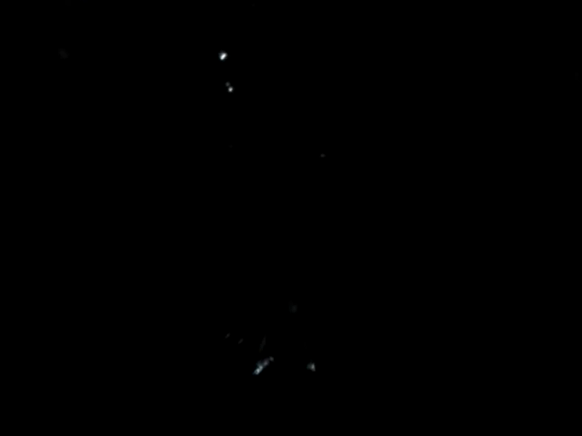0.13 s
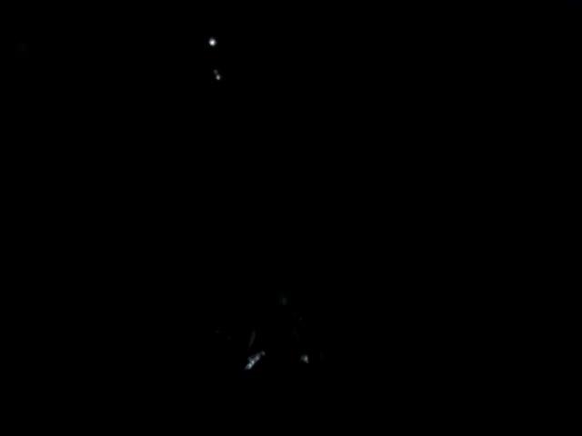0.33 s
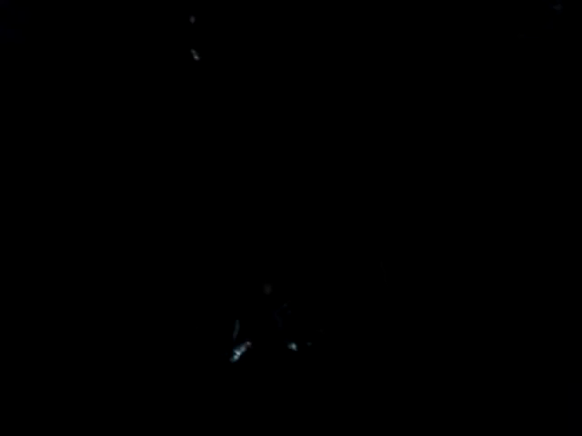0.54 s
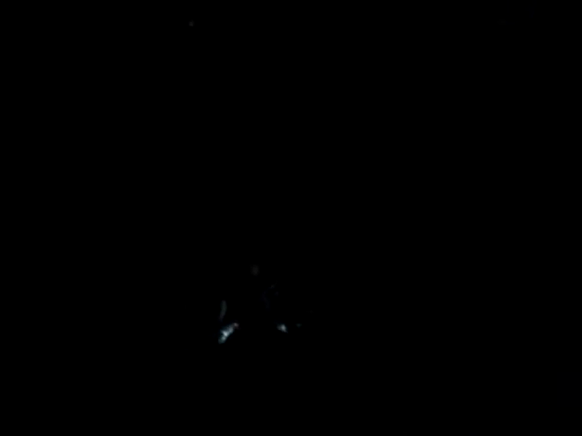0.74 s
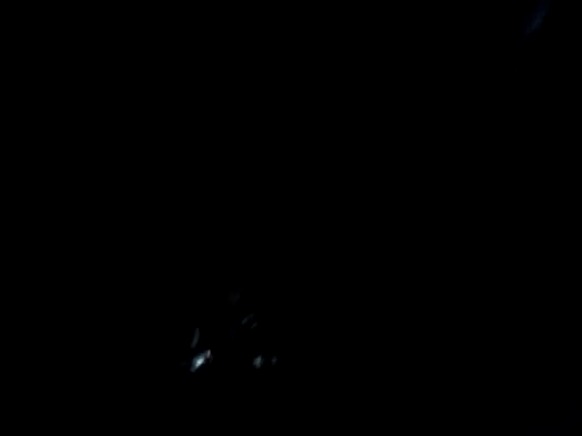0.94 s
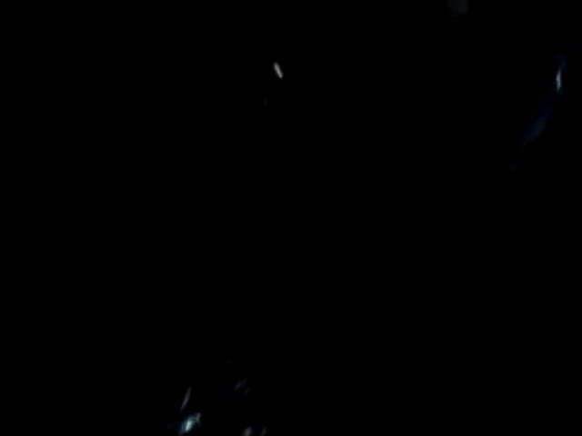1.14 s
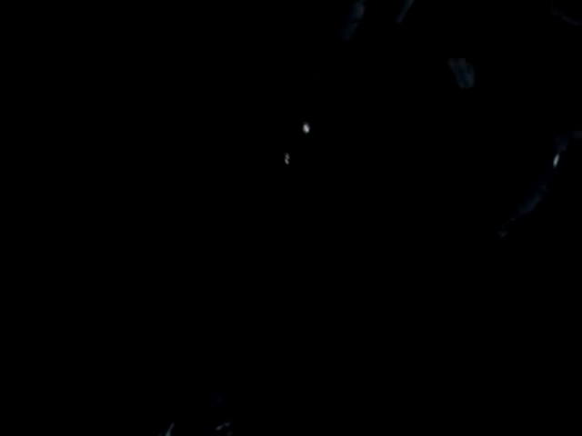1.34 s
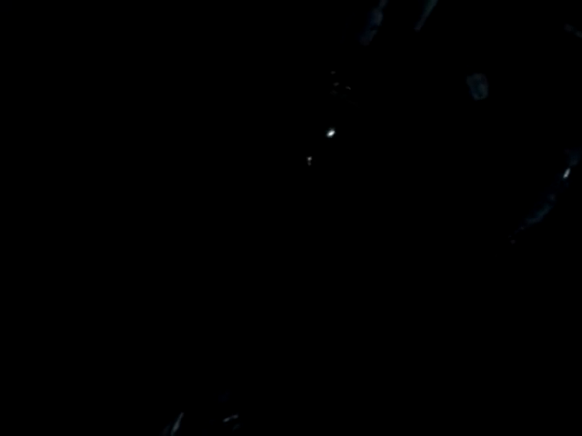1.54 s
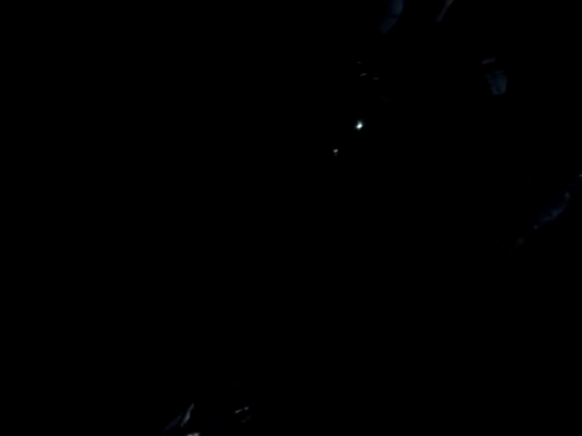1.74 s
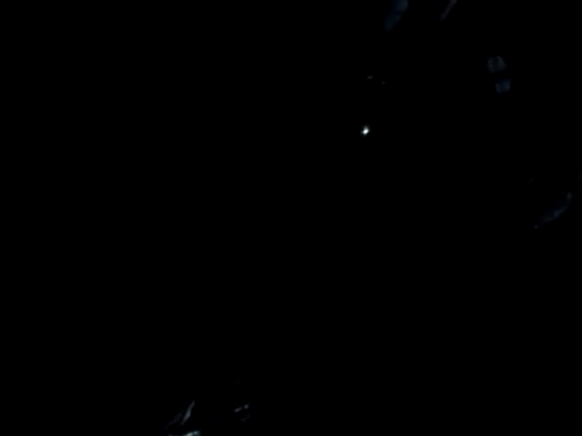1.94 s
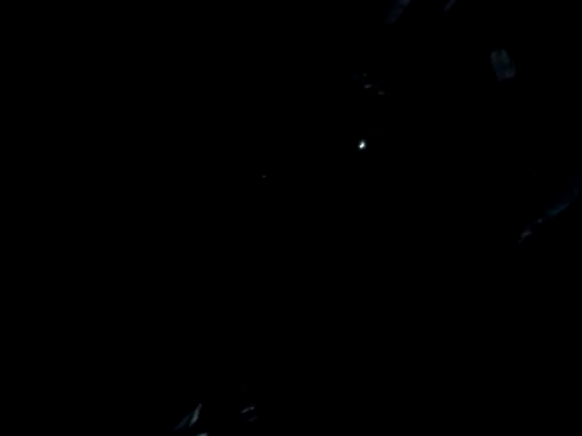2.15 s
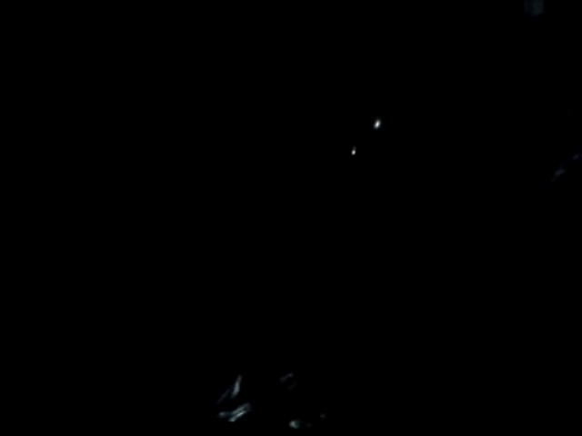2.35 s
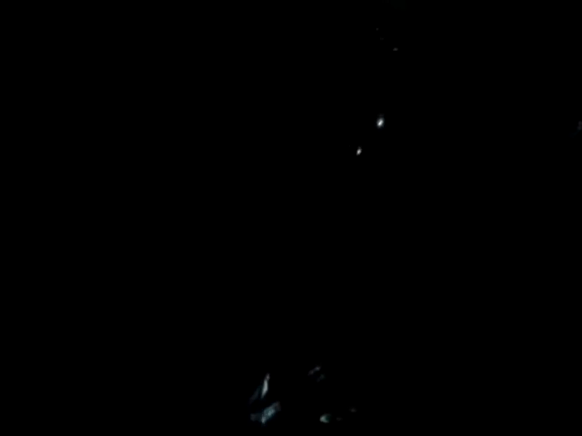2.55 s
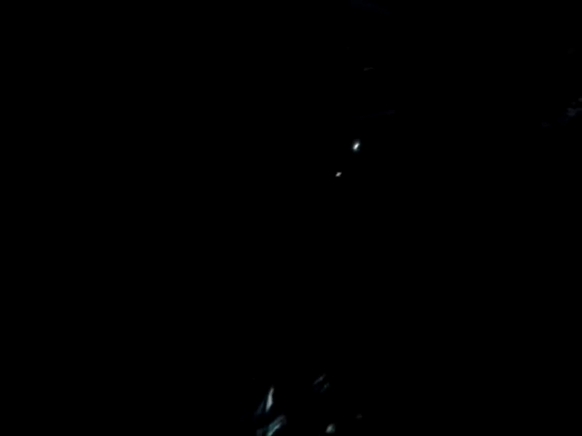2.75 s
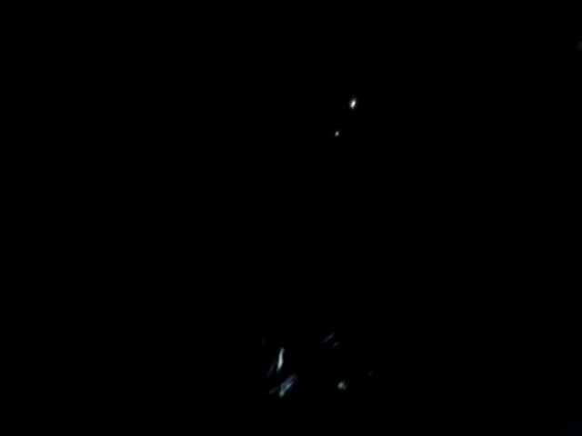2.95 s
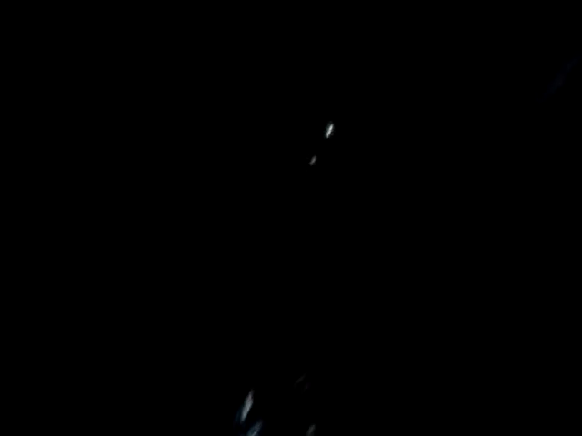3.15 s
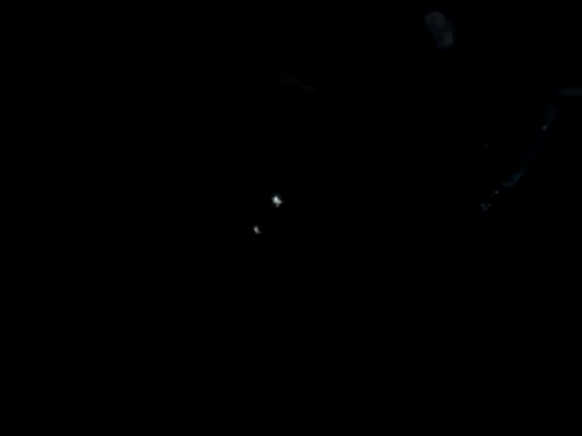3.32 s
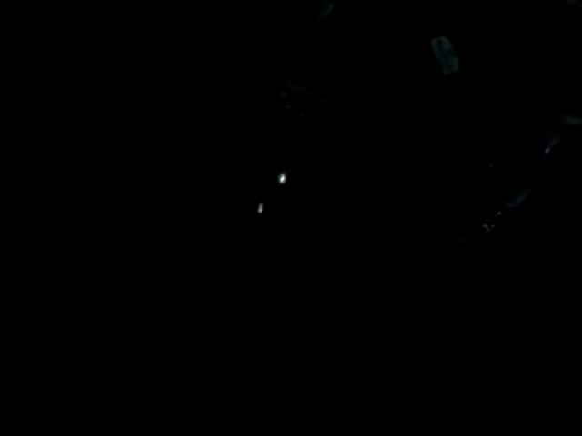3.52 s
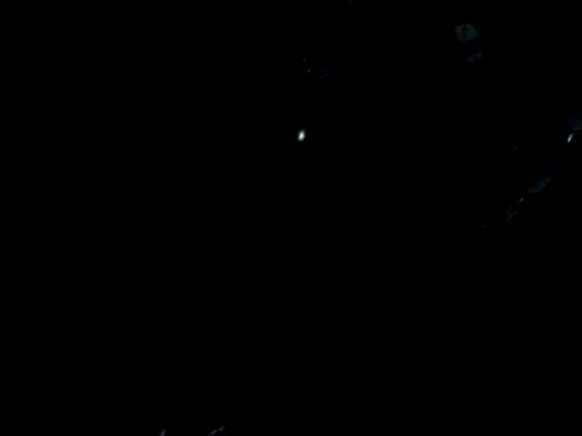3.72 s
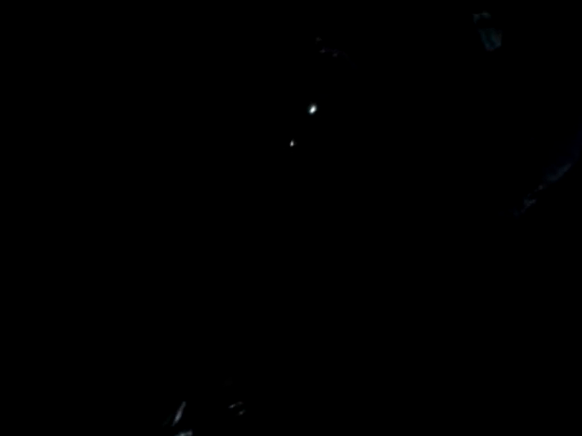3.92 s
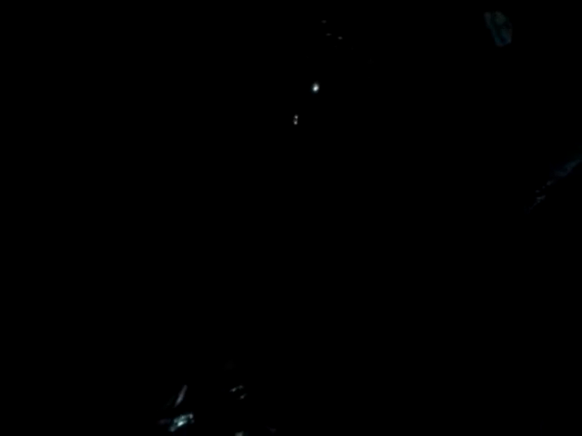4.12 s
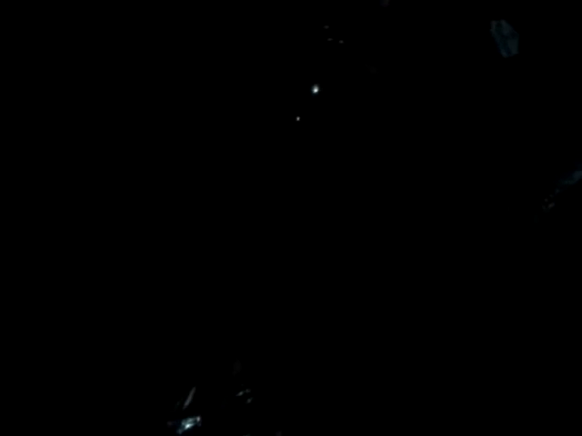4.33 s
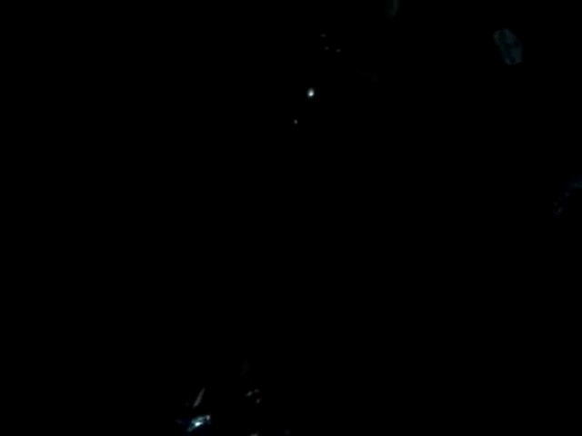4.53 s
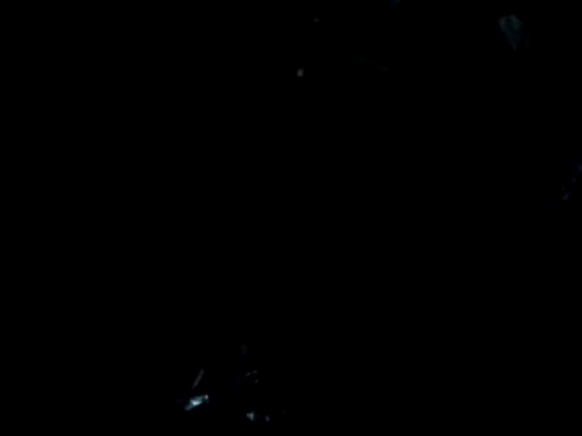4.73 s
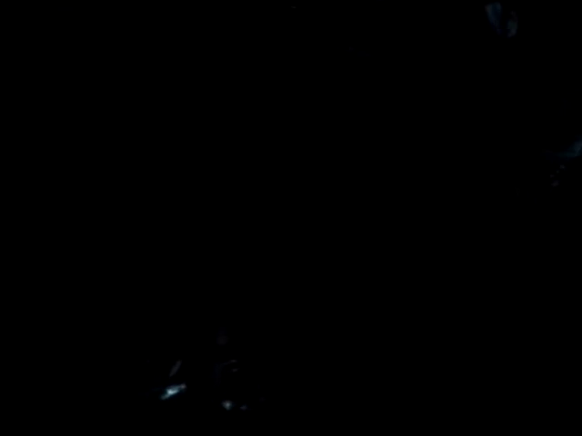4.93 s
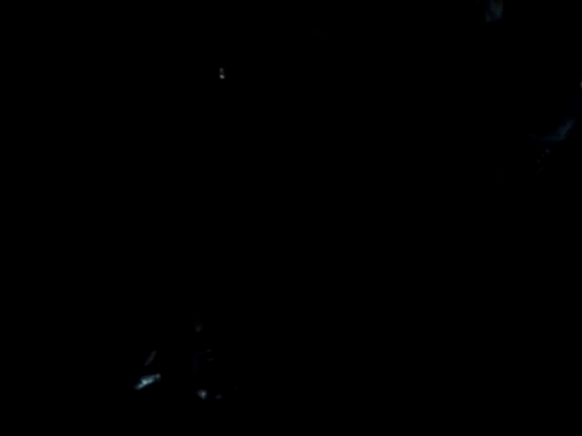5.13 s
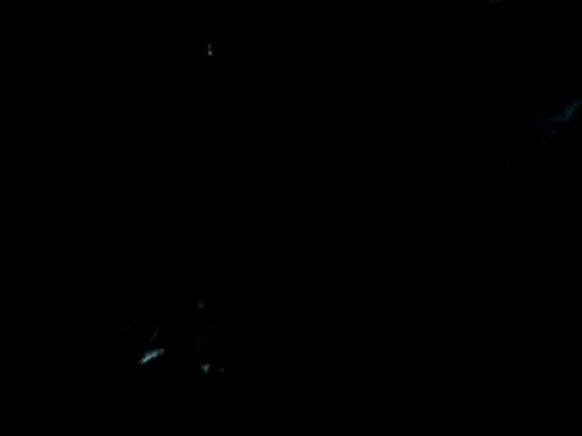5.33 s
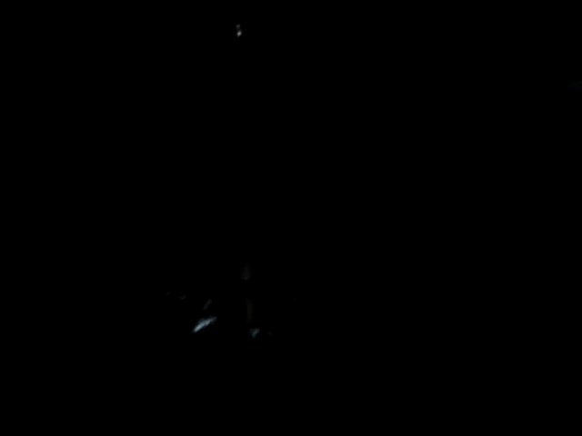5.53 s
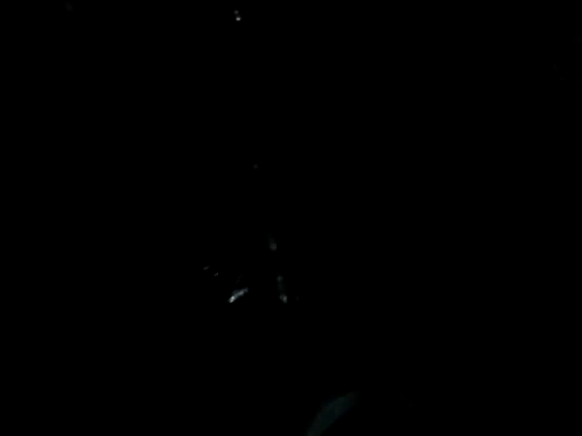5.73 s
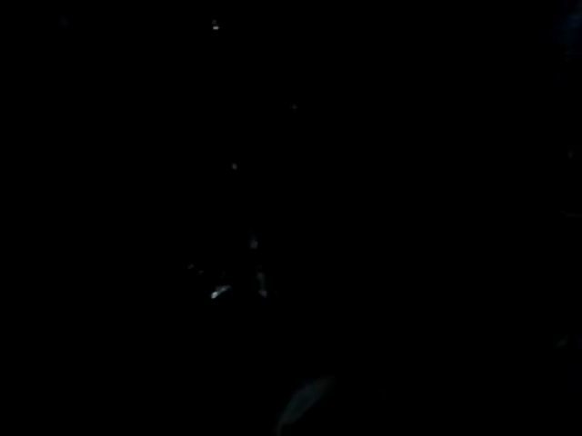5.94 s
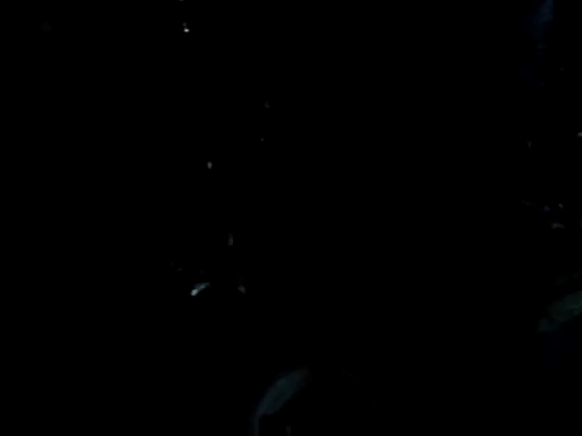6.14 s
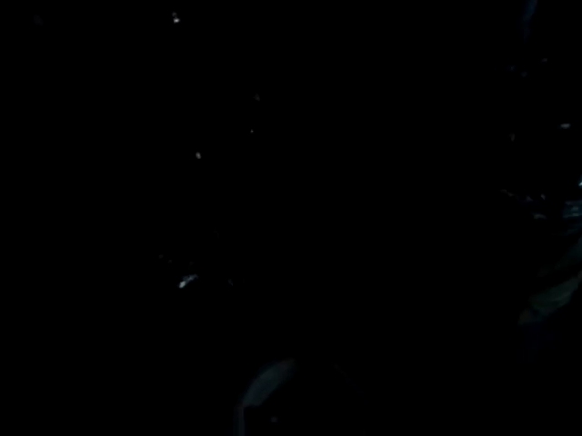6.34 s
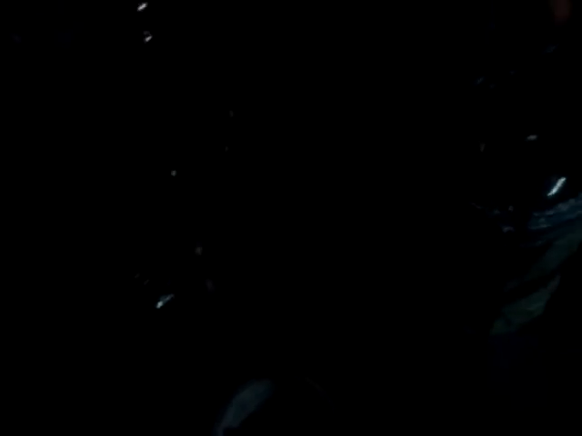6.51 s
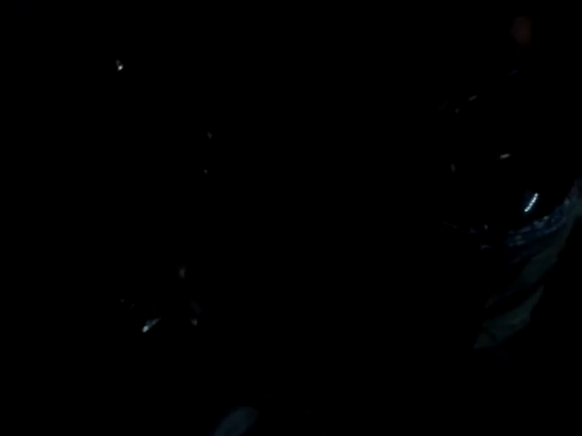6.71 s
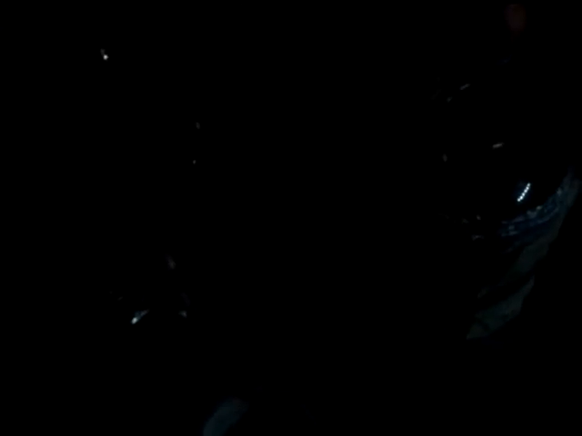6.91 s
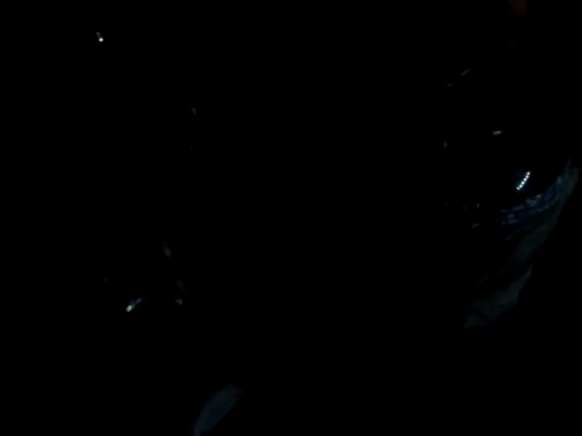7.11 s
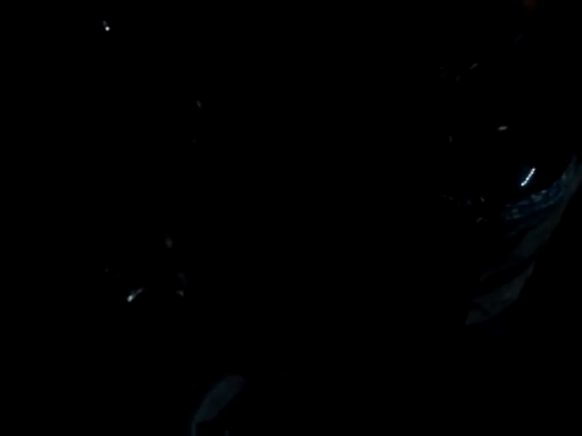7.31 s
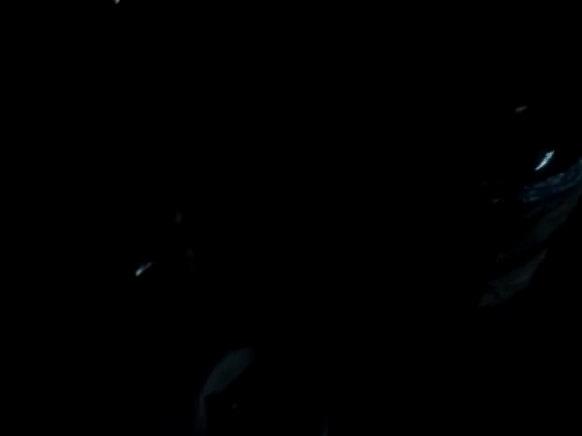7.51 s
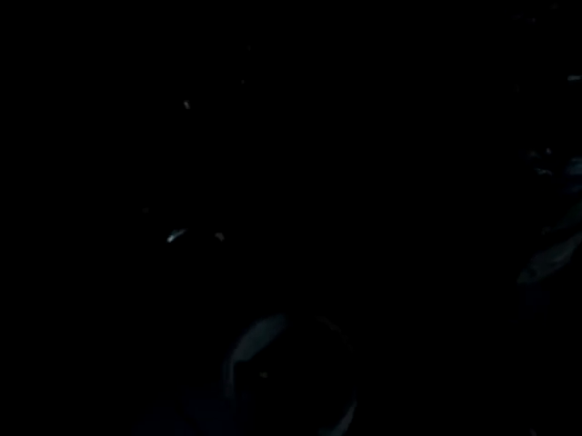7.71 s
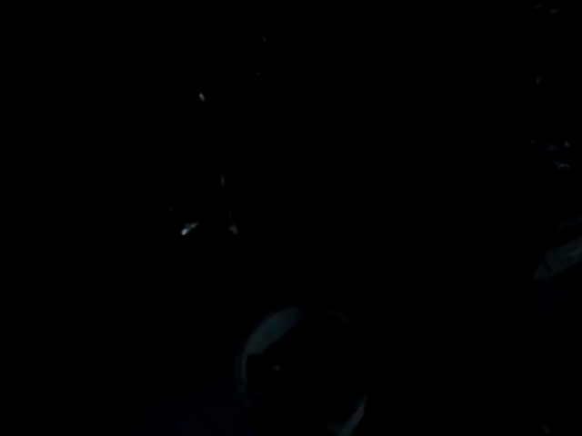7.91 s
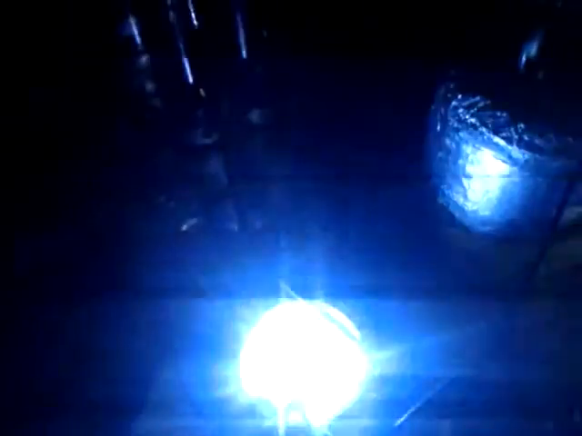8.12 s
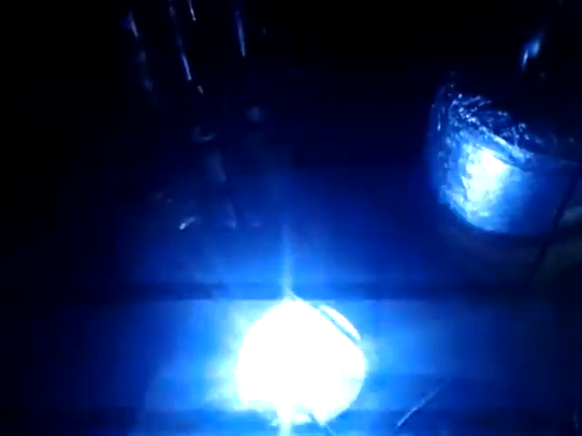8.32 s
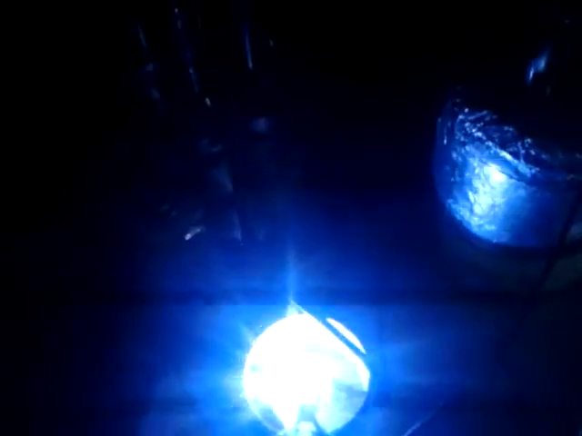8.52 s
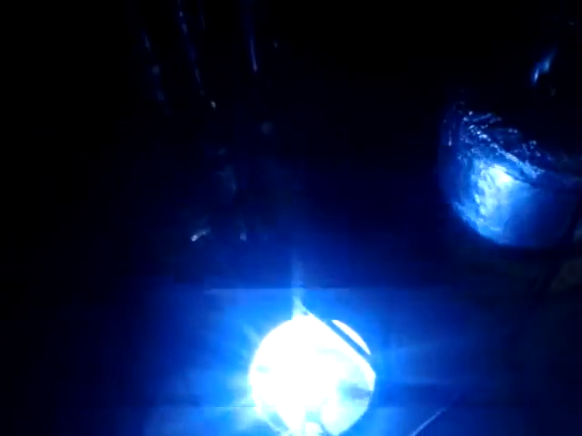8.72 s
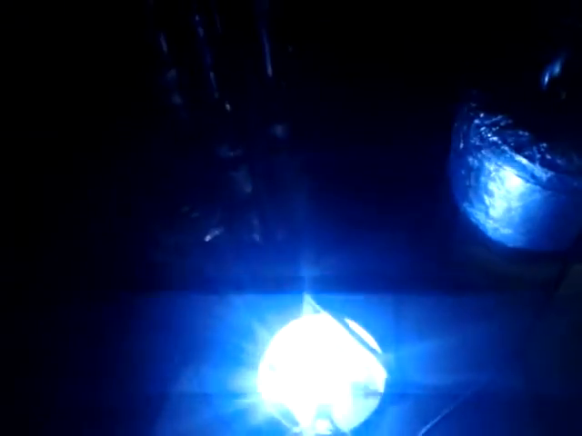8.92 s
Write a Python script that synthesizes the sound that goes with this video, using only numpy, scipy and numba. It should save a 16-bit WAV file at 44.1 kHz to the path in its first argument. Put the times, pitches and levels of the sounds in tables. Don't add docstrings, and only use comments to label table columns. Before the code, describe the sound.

In a dark workshop, a high-voltage gap sizzles close to a hand-held microphone: a thin, bright, rapidly pulsing hiss with an electrical buzz, wavering as the camera moves. Soft fan air and motor hum sit behind, with faint grip knocks. After eight seconds tiny snaps trigger a sudden, dense, piercing arc roar that overloads the microphone, is pulled down in level, and stutters with sharp snaps near the end.

```python
import sys
import numpy as np
from scipy import signal
from scipy.fft import rfft, irfft
from scipy.io import wavfile
from scipy.ndimage import uniform_filter1d
from numba import njit

SR = 44100
rng = np.random.default_rng(int(sys.argv[2]) if len(sys.argv) > 2 else 0)


def generate_wav(signal):
    frames = np.transpose(np.atleast_2d(signal))
    scaled = np.clip(frames, -1, 1) * 32767
    pcm = np.round(scaled).astype(np.int16)
    wavfile.write(sys.argv[1], SR, pcm)


def invert_db(x):
    u = np.asarray(x, float) / 20
    return 10 ** u


N = 399534
T = np.arange(N) / SR

# [t/s, level/dB, aim of the port at the gap/dB]
SIZZLE = [(0, -19, -14), (.25, -23.5, -5), (.6, -18, -12), (1.15, -20, -5.5), (1.55, -20, -4),
          (2.1, -22, -2.5), (2.4, -20, -6), (2.6, -23.5, -3), (3.1, -23.5, -4), (3.25, -19, -6.5),
          (4.4, -20, -8), (5.2, -19, -7), (5.95, -21, -11.5), (6.4, -21, -6.5), (7.3, -20.5, -8),
          (7.7, -22, -8), (7.95, -22.5, -10), (8.1, -22, -8)]
# [share of the half cycle/1, level/dB]
SWARM = [(0, -9), (.07, -6), (.13, 1), (.2, 5.5), (.27, 4.5), (.4, .5), (.55, -2), (.75, -2), (.87, -4.5),
         (1, -9)]
# [f/Hz, level/dB]
TOP_SPECTRUM = [(7000, -30), (10500, -2), (13500, -3), (14600, -2), (15500, 1)]
# [t/s, level/dB, length/s]
SHADES = [
    (.2, 0, 0.07),
    (.46, -2.5, 0.032),
    (1.43, -2, 0.036),
    (3.13, -3.5, 0.033),
    (4.41, -0.5, .03),
    (5.93, -2, .03),
    (6.7, -0.5, 0.024),
    (7.4, -0.5, .03),
    (7.87, -1, .05),
]
# [t/s, peak level/dB]
SNAPS = [
    (8.0810, -1),
    (8.0856, -5),
    (8.8900, 14),
    (8.8950, 8),
    (8.8996, 10),
    (8.9040, 10),
    (8.9060, 10),
    (8.9085, 9),
    (8.9155, 8),
]
# [f/Hz, density level/dB]
ARC_SPECTRUM = [(35, -81), (60, -86), (346, -4.5), (767, 0), (2650, -4.5), (4970, -10), (6580, -11),
                (7570, -28), (8320, -7.5), (14900, -7.5), (16000, -16.5)]
# [f/Hz, width/Hz, level/dB]
ARC_MODES = [(6890, 40, -12), (7110, 80, -11), (7470, 45, 0), (7560, 170, -3), (7700, 900, -16),
             (7775, 50, -2), (8200, 120, -10), (8320, 40, -10), (8440, 40, -10), (8710, 50, -10),
             (9290, 250, -11), (9490, 50, -12), (10300, 150, -15), (10900, 100, -14), (11640, 120, -14),
             (12500, 600, -18), (15270, 120, -16)]
# [t/s, level/dB, length/s]
STUTTER = [
    (8.902, -21, .014),
]
# [f/Hz, rms level/dB]
BUZZ = [(120, -86), (240, -62), (360, -74), (480, -62), (700, -59), (1000, -62), (1900, -62), (2600, -66),
        (4400, -63), (5400, -57), (6100, -62), (6700, -47), (7500, -42), (9600, -60)]
# [multiple of the crest rate/1, t/s, level/dB, length/s]
STANDING = [(5, 2.4, 10.5, 0.64), (5, 3.6, 9, 0.65), (5, 5.2, 8, 0.96), (5, 6.8, -15, .8),
            (8, .9, 11.5, 0.89), (8, 5.14, 13, 0.94), (7, 3.45, 8, .6), (9, .4, 6, .6), (9, 4.6, 8.5, 0.73),
            (9, 6.5, 10.5, 1.05), (16, 0.62, 8, .5), (16, 2.5, 8.5, 1), (16, 5.1, 8, 0.28),
            (16, 6.53, 11, 1), (12, 6.1, 8, 1.4), (17, 6.9, 9, .9), (19, 5.4, 13, 0.64)]
# [f/Hz, density level/dB]
FAN_SPECTRUM = [(35, -80), (60, -50), (96, -3.5), (166, -8), (282, -10), (435, 0), (656, -8.5), (830, -4),
                (1350, -6), (2090, -10.5), (2390, -9.5), (3980, -9.5), (5890, -8), (6500, -5), (8450, -17),
                (14300, -120)]
# [f/Hz, rms level/dB]
FAN_LINES = [
    (168, -59.5),
    (195, -95),
]
# [lag/ms, share/1, sway/ms]
ECHOES = [
    (0.92, 0.061, 0.092),
    (.36, 0.091, 0.027),
]
# [t/s, lag/ms, share/1]
BENCH = [
    (0, 0.78, 0.13),
    (1.3, .7, .07),
    (2.2, 0.76, 0.064),
    (2.8, 0.77, .22),
    (3.3, 0.7, .03),
    (3.9, 0.7, 0.22),
    (4.8, 0.68, 0.042),
    (6, 0.81, 0.2),
    (8, 0.74, 0.17),
]
# [t/s, level/dB, length/s]
GRIPS = [(.46, 12, .04), (.96, 10, .05), (2.27, 27, .15), (2.69, 18, .05), (3.05, 20, 0.27),
         (3.41, 18, .05), (3.56, 4, .05), (3.97, 19, 0.053), (4.25, 19, .1), (4.75, 4, .05),
         (5.72, 11, .06), (5.99, 13, .05), (7.15, 8, 0.042), (8.05, 10, .05)]
# [t/s, level/dB, length/s]
LURCHES = [
    (8.165, 30, .025),
    (8.21, 28, .025),
    (8.265, 30, .03),
    (8.51, 33, .02),
    (8.725, 30, .02),
    (9.055, 24, .02),
]
# [t/s, lower f/Hz, upper f/Hz, level/dB]
SIDE_BANDS = [
    (8.275, 4000, 5700, -29),
    (8.344, 8000, 10400, -21),
    (8.344, 14500, 15900, -27),
    (8.622, 4200, 5300, -34),
    (8.715, 8000, 9700, -23),
    (8.854, 11500, 13200, -27),
    (8.9, 6800, 8400, -18),
]

CREST_HZ, CREST_S = 120.005, .00035
ARC_S = 8.1158
MEAN_DB, MEAN_AIM_DB = -20.5, -8


def sizzle():
    near_db, aim_db = curves(SIZZLE)
    swell_db = near_db - MEAN_DB
    turns = (T - CREST_S) * CREST_HZ + 1
    crest_db = .5 * rng.standard_normal(N // 100)[turns.astype(int)]
    swarm = invert_db(np.interp(turns % 1, *np.transpose(SWARM)) + crest_db)
    clicks = sparks(16000., 2.5) * swarm

    port_hz = 7820 + 11 * (aim_db - MEAN_AIM_DB) + 110 * walk(8)
    port = band(band(clicks, port_hz, 2140), port_hz, 3000.)
    port = signal.sosfilt(signal.butter(8, 6500., "high", fs=SR, output="sos"), port)
    port = level(port, -1.01) * invert_db(.5 * walk(14))

    fine = rng.standard_normal((2, N))
    skirt = band(band(fine[0] * swarm, 9380, 2600), 9380, 4700.)
    skirt = level(skirt, -2) * invert_db(aim_db + 1.8 * walk(8))
    top = colour(fine[1] * swarm ** .38, TOP_SPECTRUM)
    top_db = -25.5 + .11 * swell_db - near_db
    top = level(top, .54) * invert_db(top_db)
    return invert_db(near_db + bumps(SHADES)) * (port + skirt + top)


def snaps():
    clicks = np.zeros(N)
    s, db = np.transpose(SNAPS)
    clicks[(s * SR).astype(int)] = invert_db(db + 13.)
    return band(band(clicks, 8200., 3500.), 8600., 5000.)


def arc():
    clicks = sparks(14000., 2.2) * invert_db(1.2 * walk(60))
    ring = np.zeros(N)
    for k, (hz, width, db) in enumerate(ARC_MODES):
        path = np.roll(clicks, 997 * k)
        ring += invert_db(db) * np.sqrt(width) * level(band(path, hz, width), 0)
    dip_db = bumps(STUTTER)
    ring = level(ring, 9.5) * invert_db(dip_db)

    room = level(clicks, 0) + level(smear(clicks, .04), -4.)
    strike_db = 1.2 * np.exp(-abs(T - ARC_S) / .08)
    roar = level(colour(room, ARC_SPECTRUM), 5.5) * invert_db(strike_db + .4 * dip_db)
    return (T > ARC_S) * (roar + ring)


def buzz():
    hz, db = np.transpose(BUZZ)
    coarse, size = T[::64], 2 ** 16
    sine = np.sin(2 * np.pi * np.arange(size) / size)
    turn = (CREST_HZ * T * size).astype(int)
    out = np.zeros(N)
    for k in range(1, 101):
        k_db = np.interp(np.log(k * CREST_HZ), np.log(hz), db)
        for points in (7, 60):
            knots = np.linspace(0, N / SR, points)
            k_db = k_db + np.interp(coarse, knots, 2.2 * rng.standard_normal(points))
        k_db = k_db + bumps([row[1:] for row in STANDING if round(row[0]) == k], coarse)
        phase = (k * turn + rng.integers(size)) & (size - 1)
        out += np.repeat(invert_db(k_db), 64)[:N] * sine[phase]
    return np.sqrt(2) * out


def fan():
    swell_db = curves(SIZZLE)[0] - MEAN_DB
    air_db = -39 - .15 * T + .05 * swell_db + bumps(SHADES)
    bright_db = 2.5 + .35 * swell_db
    air = level(colour(rng.standard_normal(N), FAN_SPECTRUM), 3.23)
    dull = signal.sosfiltfilt(signal.butter(2, 1800., fs=SR, output="sos"), air)
    air = dull + (air - dull) * invert_db(bright_db)
    air = air * invert_db(air_db + .33 * walk(12))
    motor = sum(np.sqrt(2) * invert_db(db) * np.sin(2 * np.pi * hz * T) for hz, db in FAN_LINES)
    return echoes(air) + motor


def handling():
    hand = band(band(rng.standard_normal(N), 145., 70.), 145., 70.)
    hand = level(hand, 1.) * invert_db(-84 + bumps(GRIPS) + 3 * walk(16))
    since = np.maximum(T - ARC_S, 0)
    jolt = invert_db(-31.) * np.exp(-since / .01) * np.sin(2 * np.pi * 60. * since)
    wobble = np.sin(2 * np.pi * 28. * since) * invert_db(-85. + bumps(LURCHES) + 2.5 * walk(9))
    return np.where(T < ARC_S, hand, wobble - jolt)


def side_bands():
    out = np.zeros(N)
    window = np.sin(np.arange(2048) * np.pi / 2048)
    for s, low_hz, high_hz, db in SIDE_BANDS:
        sos = signal.butter(8, [low_hz, high_hz], "band", fs=SR, output="sos")
        noise = signal.sosfilt(sos, rng.standard_normal(4096))[2048:]
        out[int(s * SR) - 1024:][:2048] += level(noise, db) * window
    return out * np.array([[1], [-1]])


def echoes(x):
    def late(lag_ms):
        return np.interp(T - lag_ms / 1000, T, x)

    bench_ms, bench_share = curves(BENCH)
    out = x - bench_share * late(bench_ms)
    for lag_ms, share, sway_ms in ECHOES:
        out = out + share * late(lag_ms + sway_ms * walk(1))
    return out


def smear(x, tail_s):
    t = np.arange(SR // 5) / SR
    return signal.fftconvolve(x, rng.standard_normal(len(t)) * np.exp(-t / tail_s))[:N]


def sparks(rate, scatter_db):
    chance = rng.random((3, N))
    size = invert_db(-scatter_db * np.log(chance[1] + 1e-9))
    return (chance[0] < rate / SR) * size * np.sign(chance[2] - .5)


@njit
def svf(x, hz, width):
    y, b, l = np.empty(len(x)), 0., 0.
    for i in range(len(x)):
        g, k = np.tan(np.pi * hz[i] / SR), width / hz[i]
        v = (b + g * (x[i] - l)) / (1 + g * (g + k))
        b, l, y[i] = 2 * v - b, l + 2 * g * v, k * v
    return y


def band(x, hz, width_hz):
    return svf(x, np.clip(hz + 0 * T, 20, .45 * SR), 1. * width_hz)


def colour(x, spectrum):
    hz, db = np.transpose(spectrum)
    f = np.arange(N // 2 + 1) * SR / N + 1
    return irfft(rfft(x) * invert_db(np.interp(np.log(f), np.log(hz), db)), N)


def level(x, db):
    return x * invert_db(db) / np.sqrt(np.mean(x ** 2))


def walk(rate):
    k = int(SR / rate)
    held = np.repeat(rng.standard_normal(N // k + 1), k)
    return 1.3 * uniform_filter1d(uniform_filter1d(held, k), k)[:N]


def bumps(table, t=T):
    return sum(db * np.exp(-((t - s) / length) ** 2) for s, db, length in table)


def curves(table):
    s, *columns = np.transpose(table)
    return [np.interp(T, s, c) for c in columns]


def scene():
    return np.tile(sizzle() + snaps() + arc() + buzz() + fan(), (2, 1))


def band_limit(x):
    return signal.sosfilt(signal.butter(12, 17060, fs=SR, output="sos"), x)


def record(dry):
    clip = .62
    flat = clip * dry / (clip ** 4 + dry ** 4) ** (1 / 4)
    settled_db, follow_s, swing_hz = -5.5, .085, 1.7
    since = np.maximum(T - ARC_S - .008, 0)
    gain_db = settled_db * (1 - np.exp(-since / follow_s) * np.cos(2 * np.pi * swing_hz * since))
    x = signal.sosfilt(signal.butter(6, 180., "high", fs=SR, output="sos"), flat * invert_db(gain_db))
    ceiling = .53 + ((T - ARC_S) / .2) ** 2
    x = x / (1 + (x / ceiling) ** 8) ** (1 / 8)
    top_cut = signal.ellip(12, .3, 75, 15750., fs=SR, output="sos")
    mix = signal.sosfilt(top_cut, x + handling() + side_bands())
    return band_limit(mix)


dry = scene()
out = record(dry)
generate_wav(out)
```